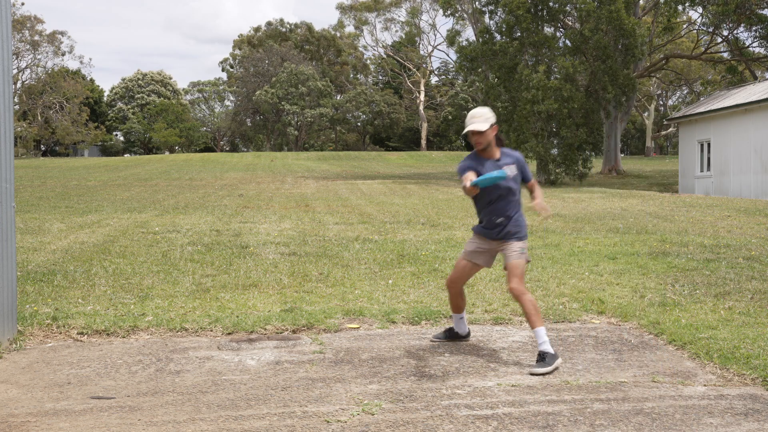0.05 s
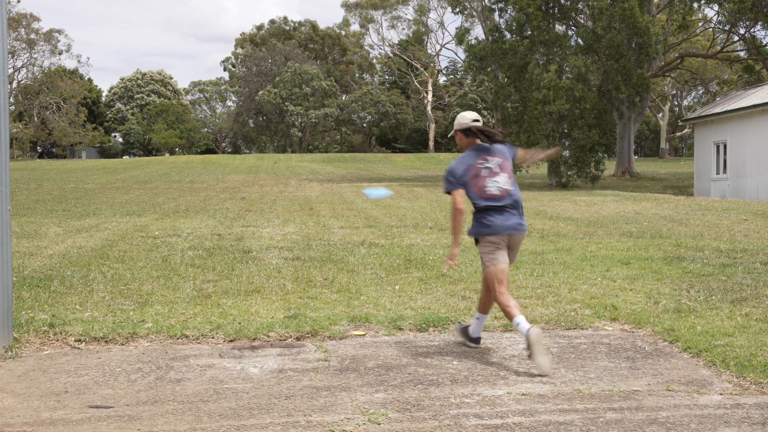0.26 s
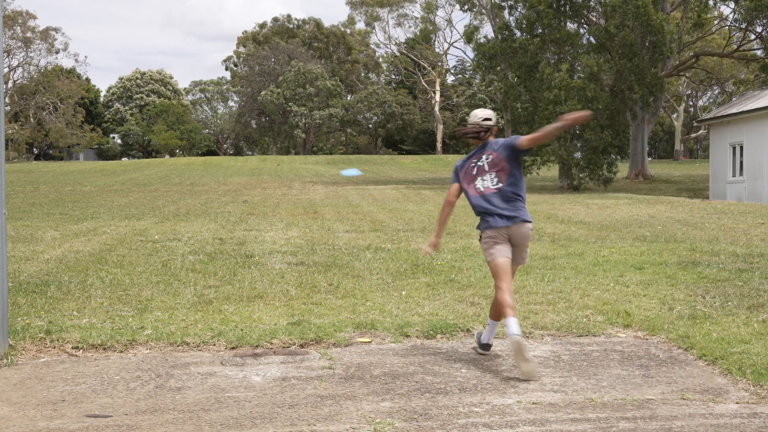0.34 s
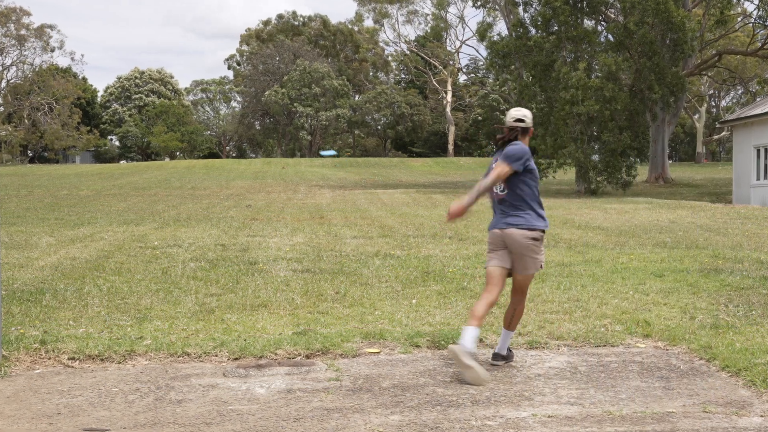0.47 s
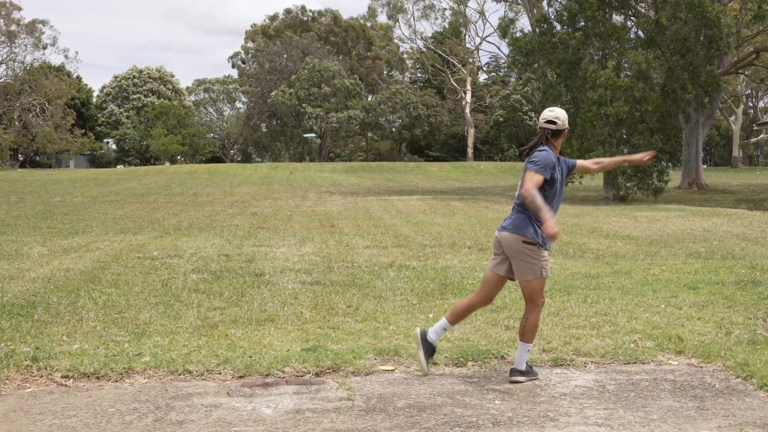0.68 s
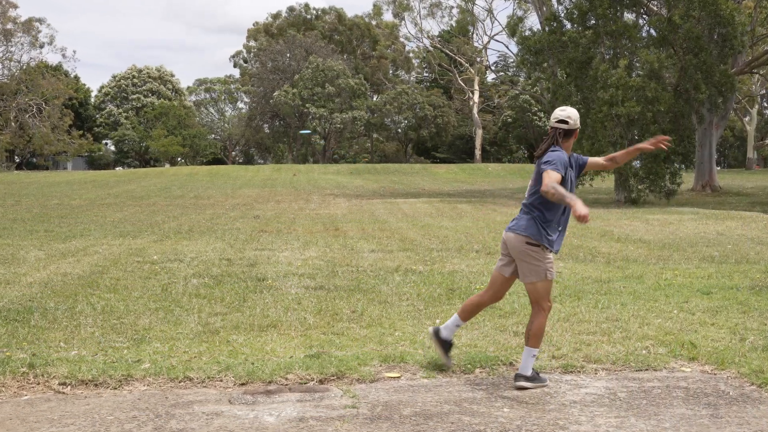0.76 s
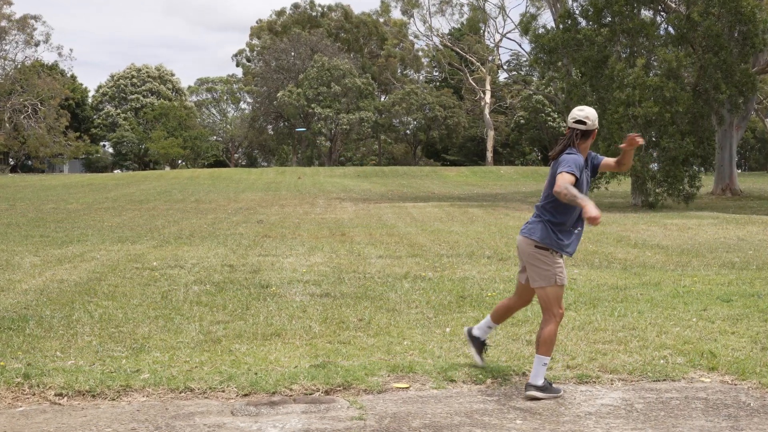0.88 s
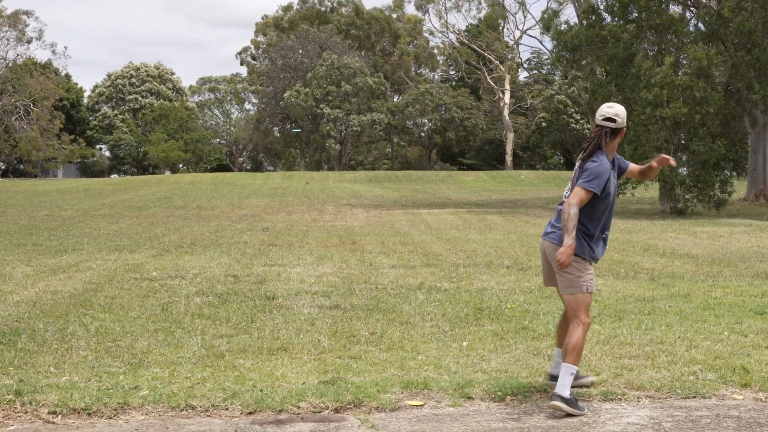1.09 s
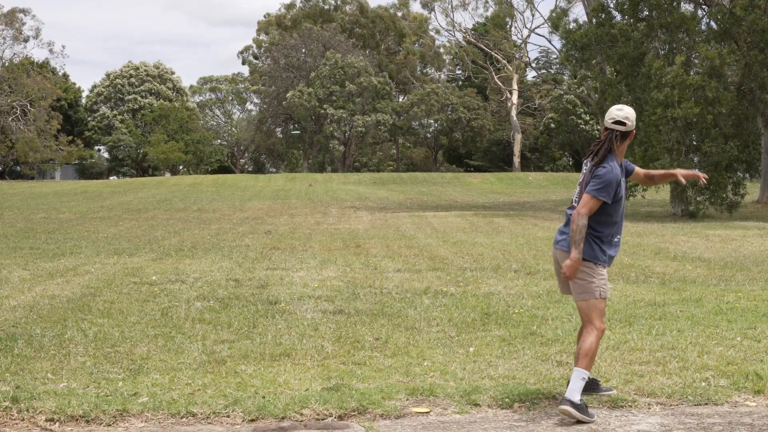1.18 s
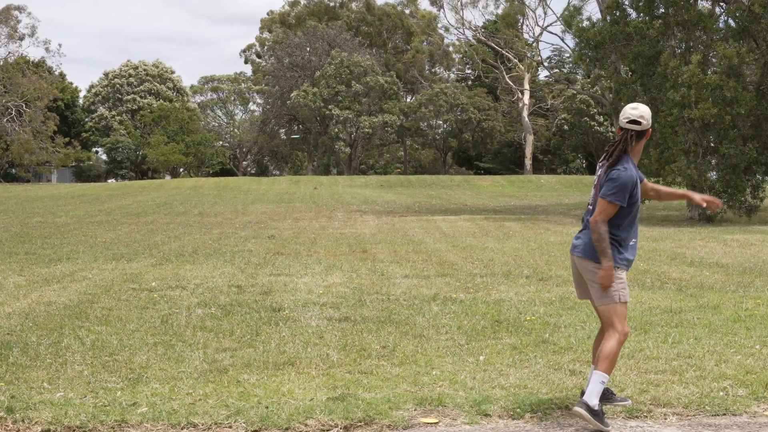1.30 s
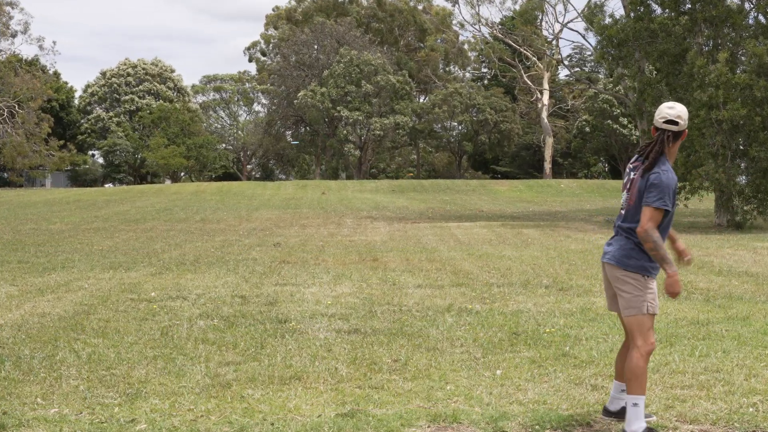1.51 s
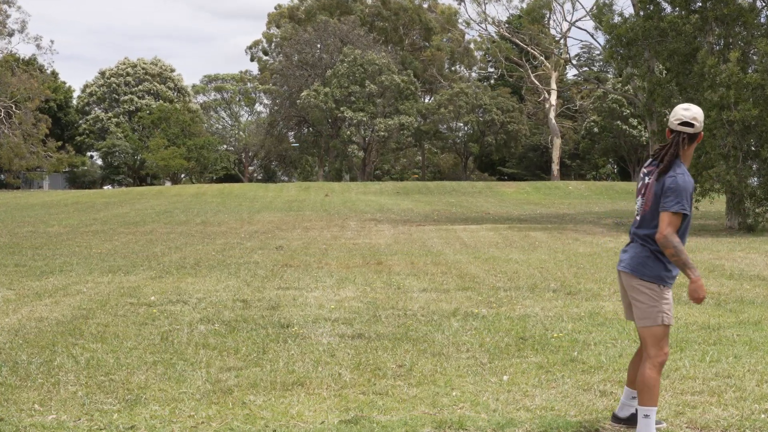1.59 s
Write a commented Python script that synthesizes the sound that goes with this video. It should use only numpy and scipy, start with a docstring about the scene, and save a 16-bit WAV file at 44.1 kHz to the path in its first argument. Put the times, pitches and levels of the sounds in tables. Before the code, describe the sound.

A flying disc is thrown with one sharp plastic snap at about 0.3 seconds, just after a shoe tap and a rising sleeve swish. It whizzes off faintly amid dull thumps. Shoes scuff and crack grit on concrete from 0.35 to 0.9 seconds, then make lighter ticks until about 1.6. Behind are a faint field rumble, a tiny bird chirp near 1 second and thin insect-like sounds.

```python
"""A plastic flying disc snaps out of a player's fingers, rings briefly and whizzes away.
The arm and shirt swish, and buffeting air and body movement make dull thumps. Shoes knock, scuff
and crack grit on a concrete pad during the throw and the follow-through. Behind it are the low
rumble of an open field, a faint high hiss, thin insect-like sounds and one distant bird chirp."""
import sys
import numpy as np
from scipy import signal
from scipy.fft import rfft, irfft, next_fast_len
from scipy.io import wavfile
from scipy.ndimage import uniform_filter1d

SR = 44100
rng = np.random.default_rng(int(sys.argv[2]) if len(sys.argv) > 2 else 0)


def transcribe(signal):
    """Save signal, clipped to [-1, 1], as a 16-bit WAV file at the path in sys.argv[1]."""
    frames = np.atleast_2d(signal).T
    limited = np.clip(frames, -1, 1)
    pcm = np.round(limited * 32767).astype(np.int16)
    wavfile.write(sys.argv[1], SR, pcm)


N = 72765


def disc(snap_s=.2845, slip_s=.2849):
    """The rim cracks off the fingertips, the plastic rings briefly and the disc whizzes away."""
    # Each row: pitch in Hz, relative level in dB, fade time in seconds.
    plastic_tones = [(547, -12.5, 0.016), (750, -17, .017), (1300, -18, 0.0084), (1810, -13, 0.011),
                     (4590, -7.5, 0.0047)]
    # Each row in these two: frequency in Hz, relative level in dB.
    crack_colour = [(600, -3), (2300, -16.5), (3300, -14), (4200, -5), (5000, -7.5), (6000, -35),
                    (7800, -14), (9300, -27), (10900, -5.5), (11900, -13.5), (12900, 4.5), (13600, 2),
                    (14500, -3), (15100, -22)]
    whizz_colour = [(2000, -26), (2600, -2.5), (3000, -8), (3400, -9.5), (4200, -15), (5000, -26)]
    crack = undb(8) * colour(click(slip_s), crack_colour)
    plastic = undb(-.5) * sum(undb(db) * ring(snap_s, hz, .00058, t60) for hz, db, t60 in plastic_tones)
    flight = undb(-42.5) * swell(peak=.335, attack=.022, t60=.25)
    return plastic - crack + flight * noise(whizz_colour)


def buffets():
    """Buffeting air and body movement make dull, low thumps."""
    # Each row: start in seconds, level in dB, pitch in Hz, fade time in seconds.
    thumps = [(.211, -33, 109, .1), (.236, -14.5, 133, 0.046), (0.255, -17, 130, 0.062),
              (.351, -10.5, 147, 0.029), (.376, -15.5, 101, 0.085), (.512, -30.5, 106, 0.11),
              (0.542, -27.5, 120, 0.11), (0.561, -29, 90, 0.042), (0.743, -38.5, 114, 0.11),
              (.795, -37, 95, 0.092), (1.015, -39.5, 165, 0.06), (1.288, -41.5, 166, 0.15),
              (1.62, -49, 104.5, 0.12)]
    return sum(undb(db) * ring(start, hz, rise=.0037, t60=t60) for start, db, hz, t60 in thumps)


def knocks(rise_s=.00031):
    """A stiff sole hits concrete: a short hollow tone with a rough edge."""
    # Each row: start in seconds, level in dB, pitch in Hz, fade time in seconds.
    hits = [(.186, -13, 1064, 0.0056), (.1859, -23, 2880, 0.0024), (.2745, -25, 1200, 0.012),
            (0.3724, -20.5, 640, 0.015), (1.025, -34, 2420, 0.0052), (1.204, -40.5, 855, 0.0093),
            (1.209, -39, 900, .007), (1.3134, -16.5, 3100, 0.0023), (1.314, -32, 1340, 0.0045),
            (1.356, -39, 920, 0.0099), (1.5124, -35.5, 1270, 0.0088), (1.593, -28.5, 2750, 0.0029)]
    edge = undb(-11) * noise([(400, 19), (2500, -5), (12000, -16)])
    return sum(undb(db) * (ring(start, hz, rise_s, t60) + edge * fade(start, rise_s, t60))
               for start, db, hz, t60 in hits)


def scuffs():
    """Rubber drags sand over concrete in a dense, slightly uneven rasp."""
    # Each row: peak time in seconds, level in dB, rise and fade times in seconds, tilt in dB per octave.
    slides = [(.082, -43, 0.0085, 0.12, -1.5), (0.225, -40, 0.011, 0.088, -1),
              (.375, -30, 0.0049, 0.061, 4), (.555, -37.5, 0.0028, 0.066, -2.5),
              (0.576, -31, .005, 0.21, 0), (.615, -44.5, 0.0082, 0.1, -6.5), (.657, -46, .012, 0.084, 0),
              (.703, -34.5, 0.021, 0.044, 0), (.725, -47.5, .015, 0.6, 5), (.88, -48, 0.019, 0.1, -2),
              (1.025, -51, .012, 0.36, -1.5), (1.19, -53.5, 0.045, 0.23, -2.5)]
    # Each row: frequency in Hz, relative level in dB.
    scuff_colour = [(400, -11.5), (600, -8), (1200, -7.5), (2100, -9.5), (3000, -2), (4000, -0.5),
                    (5200, -6), (8000, -10.5), (12500, -7), (15500, -7)]
    sand = grains(per_second=12000, spread_db=3) * undb(.8 * wander(214))
    return sum(undb(db) * colour(sand * swell(peak, attack, t60), scuff_colour, tilt)
               for peak, db, attack, t60, tilt in slides)


def grit():
    """Single grains crack under a sole: a sharp click and a faint crumble."""
    # Each row: start in seconds, level in dB, tilt in dB per octave.
    cracks = [(0.1448, -18.5, 8), (.307, -19, 1), (.348, -11.5, 11), (.3625, -13, 5), (0.6559, -17, -3),
              (.6857, -21, 1), (0.695, -32, 0), (0.705, -15.5, -3.5), (.7475, -29, 7), (.761, -23.5, 10),
              (.787, -22.5, 0.5), (0.8482, -17.5, 3), (1.059, -18, 6.5), (1.175, -23, 15),
              (1.193, -25.5, 10), (1.538, -26.5, 1), (1.617, -32, 1)]
    # Each row: frequency in Hz, relative level in dB.
    grit_colour = [(500, -12), (2000, -7), (4000, 4.5), (6000, -2.5), (8500, 0.5), (11000, 5.5),
                   (13000, -4), (16000, -10)]
    crumble = undb(-19) * rng.standard_normal(N)
    out = np.zeros(N)
    for start, db, tilt in cracks:
        crack = click(start) + crumble * fade(start, rise=.00015, t60=.0059)
        out += undb(db) * colour(crack, grit_colour, tilt)
    return out


def body():
    """Air flutters low around the moving body; the arm and shirt swish and the cloth rustles."""
    # How hard the body moves. Each row: time in seconds, relative level in dB.
    effort_points = [(0, -37), (.04, -25.5), (.14, -16), (.2, -7.5), (.225, -9), (.25, -3), (.285, -1.5),
                     (.315, -3.5), (.38, 2.5), (.41, -7), (.45, -11), (.51, -14), (.565, -6.5), (.62, -20),
                     (.7, -16.5), (.8, -23), (.95, -27.5), (1.2, -27), (1.3, -23), (1.42, -41), (1.65, -25)]
    # Each row: peak time in seconds, level in dB, rise and fade times in seconds.
    swishes = [(0.247, -40, 0.018, 0.14), (0.284, -27, 0.014, 0.092), (.335, -40, 0.022, 0.27),
               (0.379, -39.5, 0.012, 0.13), (.5, -42.5, 0.024, 0.23), (.61, -50.5, .03, 0.22),
               (1.2, -50, 0.02, .12)]
    # Each row in these three: frequency in Hz, relative level in dB.
    air_colour = [(30, -23), (45, -16.5), (70, -0.5), (110, 1), (160, -0.5), (225, -5), (300, -11),
                  (450, -17)]
    swish_colour = [(200, -11), (350, -0.5), (550, 3), (1100, 1), (1600, -6), (2200, -11), (3300, -14),
                    (5500, -22), (15000, -17)]
    cloth_colour = [(1500, -1), (3500, -3), (6000, -6.5), (9000, -4.5), (12500, 3), (16000, -2.5)]
    effort_db = curve(effort_points)
    air = undb(-29.5 + effort_db) * noise(air_colour)
    swish = swells(swishes) * colour(grains(per_second=3500, spread_db=2.4), swish_colour)
    rustle = undb(-43 + .54 * effort_db) * colour(grains(per_second=7000, spread_db=4.6), cloth_colour)
    return air + swish + rustle


def field():
    """A distant rumble, a faint high hiss (perhaps shirt cloth) and thin calls (probably insects)."""
    # The hiss swells and briefly dips. Each row: time in seconds, level in dB.
    hiss_levels = [(0, -81), (.95, -61), (1.06, -52), (1.12, -71), (1.2, -54.5), (1.32, -51), (1.38, -61),
                   (1.65, -58)]
    # Each row: peak time in seconds, level in dB, rise and fade times in seconds.
    calls = [(1.345, -54.5, .02, .3), (1.41, -59, .025, .1), (1.463, -52.5, 0.0086, 0.22)]
    # Each row in these three: frequency in Hz, relative level in dB.
    rumble_colour = [(30, -27), (70, -7), (120, -2.5), (230, -2.5), (400, -8.5), (1000, -5.5), (1400, -9),
                     (2100, -16), (3400, -9), (4700, -12), (5600, -18), (7500, -13), (10000, -11.5),
                     (12000, -16.5), (15500, -14)]
    hiss_colour = [(2000, -15), (4000, 2.5), (6000, -11), (9500, 2), (12000, -1), (16000, 2.5)]
    call_colour = [(7200, -26), (8600, -2), (9500, -1), (10500, -2), (12000, -20)]
    rumble = undb(-53 + .56 * wander(29)) * noise(rumble_colour)
    hiss = undb(curve(hiss_levels)) * colour(grains(per_second=16000, spread_db=1.8), hiss_colour)
    return rumble + hiss + swells(calls) * noise(call_colour)


def bird(peak_s=1.02, width_s=.02, middle_hz=5550, hz_per_s=54000):
    """A distant bird whistles one thin note that glides up and wavers."""
    age = clock() - peak_s
    glide = np.clip(middle_hz + hz_per_s * age, 0, SR / 2)
    hz = glide * (1 + .035 * wander(700))
    loudness = undb(-56) * np.exp(-(age / width_s) ** 2 / 2)
    return loudness * np.sin(2 * np.pi * np.cumsum(hz) / SR)


def undb(db):
    """Turn decibels into a multiplier."""
    return 10 ** (np.asarray(db) / 20)


def clock():
    """Time of every sample in seconds."""
    return np.arange(N) / SR


def curve(rows):
    """Straight lines through (seconds, value) rows."""
    return np.interp(clock(), *np.array(rows).T)


def colour(x, points, tilt_db=0):
    """Shape the tone along (Hz, dB) points; a positive tilt, in dB per octave, brightens it."""
    size = next_fast_len(N + 8192) * 2
    octave = np.log2(np.maximum(np.fft.rfftfreq(size, 1 / SR), 5))
    hz, db = np.array(points, float).T
    inside = np.clip(octave, np.log2(hz[0]), np.log2(hz[-1]))
    gain = undb(np.interp(octave, np.log2(hz), db) + tilt_db * inside - 20 * abs(octave - inside))
    gain /= np.sqrt(np.mean(gain ** 2))  # white noise keeps its power
    # Make the filter ring only after a sound, never before it.
    cepstrum = irfft(np.log(gain))
    cepstrum[1:size // 2] *= 2
    cepstrum[size // 2 + 1:] = 0
    return irfft(rfft(x, size) * np.exp(rfft(cepstrum)))[:N]


def noise(points):
    """Steady noise shaped along (Hz, dB) points."""
    return colour(rng.standard_normal(N), points)


def click(start):
    """A click one sample long."""
    return 1. * (np.arange(N) == int(start * SR))


def fade(start, rise, t60):
    """Loudness of a hit: a quick rise, then a fall of 60 dB in the fade time t60."""
    age = np.maximum(clock() - start, 0)
    return (1 - np.exp(-(age / rise) ** 2)) * np.exp(-np.log(1000) * age / t60)


def ring(start, hz, rise, t60):
    """One struck tone that dies away."""
    return fade(start, rise, t60) * np.sin(2 * np.pi * hz * (clock() - start))


def swell(peak, attack, t60):
    """Loudness that grows to a peak and dies away."""
    age = clock() - peak
    return np.exp(-(np.minimum(age, 0) / attack) ** 2 - np.log(1000) * np.maximum(age, 0) / t60)


def swells(rows):
    """Several swells added up, each at its own level."""
    return sum(undb(db) * swell(peak, attack, t60) for peak, db, attack, t60 in rows)


def grains(per_second, spread_db):
    """Dense tiny clicks of uneven size, with an average power of 1."""
    size = undb(spread_db * np.minimum(rng.exponential(size=N), 4))
    clicks = (rng.random(N) < per_second / SR) * rng.standard_normal(N) * size
    return clicks / clicks.std()


def wander(rate):
    """A smooth random drift of about 1 either way; a higher rate moves faster."""
    width = max(int(SR / rate), 2)
    drift = uniform_filter1d(rng.standard_normal(N), width, mode="wrap")
    drift = uniform_filter1d(drift, width, mode="wrap")
    return drift / drift.std()


def scene():
    """Throw, footwork and field in one channel, with no walls to echo them."""
    return (disc() + buffets() + knocks() + scuffs() + grit() + body() + field() + bird())[None]


def record(dry, low_hz=35, top_hz=15750):
    """Cut the deepest rumble and the highest treble."""
    low_cut = signal.butter(2, low_hz, "high", fs=SR, output="sos")
    top_cut = signal.ellip(10, .2, 70, top_hz, fs=SR, output="sos")
    return signal.sosfilt(top_cut, signal.sosfilt(low_cut, dry))


dry = scene()
out = record(dry)
transcribe(out)
```